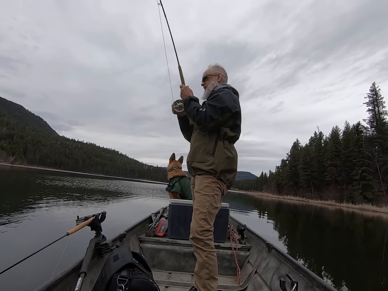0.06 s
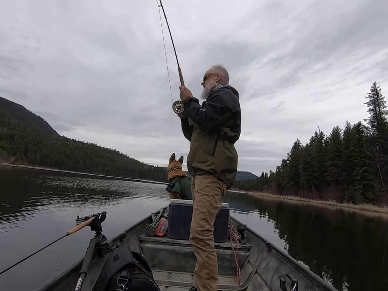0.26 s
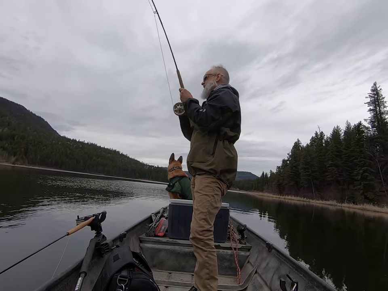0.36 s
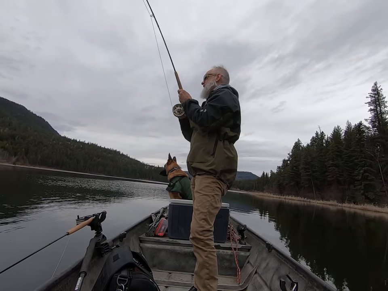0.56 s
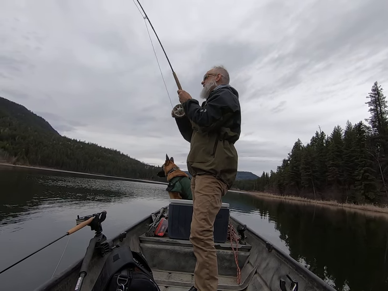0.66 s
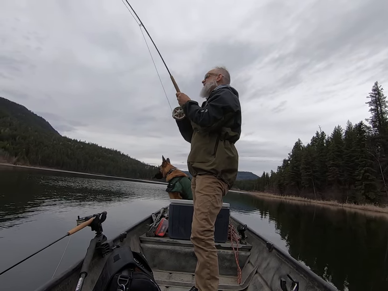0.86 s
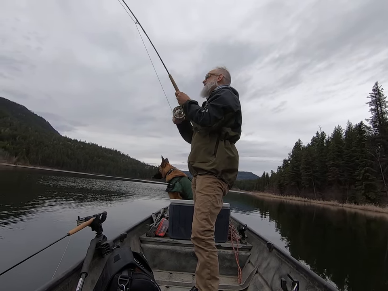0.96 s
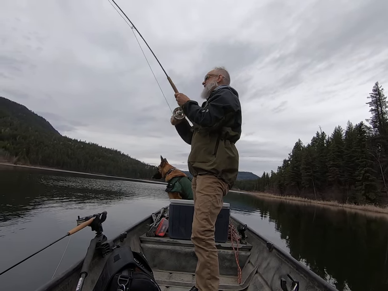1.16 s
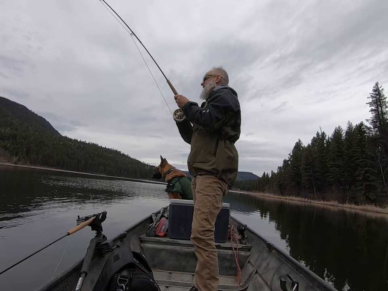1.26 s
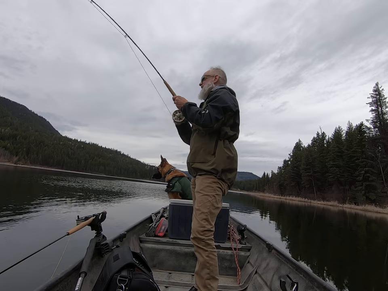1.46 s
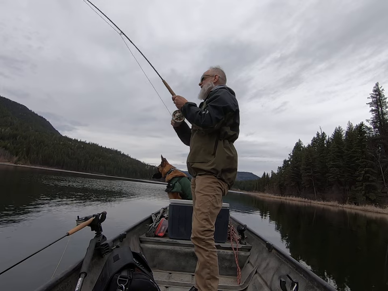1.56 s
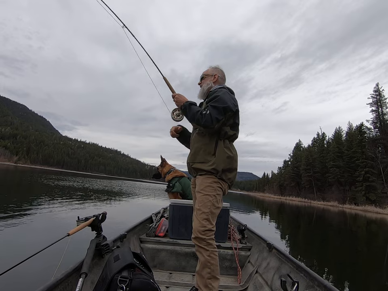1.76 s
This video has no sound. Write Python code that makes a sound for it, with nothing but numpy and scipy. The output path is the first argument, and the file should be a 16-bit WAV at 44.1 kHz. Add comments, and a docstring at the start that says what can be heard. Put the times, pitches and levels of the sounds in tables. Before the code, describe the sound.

A fly reel clicks rapidly as line is pulled off it in a small boat.

```python
"""A fly reel clicks quickly as line is pulled off it, in a small boat on a calm lake.
A small catch, the pawl, hits each tooth of the turning spool and makes a snap and a bright metal ring.
These swell and fade as the spool turns, while the line rasps and sings in the rod's guides.
Around them are a few dry ticks, soft knocks on the hull and a quiet wash of air and water."""
import sys
import numpy as np
from scipy import signal
from scipy.io import wavfile

SR = 44100
rng = np.random.default_rng(int(sys.argv[2]) if len(sys.argv) > 2 else 0)


def generate_wav(signal):
    """Clip the signal to [-1, 1] and save it as 16-bit WAV at the path in sys.argv[1]."""
    frames = np.transpose(np.atleast_2d(signal))
    scaled = np.clip(frames, -1, 1) * 32767
    pcm = np.round(scaled).astype(np.int16)
    wavfile.write(sys.argv[1], SR, pcm)


N = 79380
T = np.arange(N) / SR

# How fast the spool turns. Each row: time in seconds, teeth passing per second.
SPOOL_SPEED = [(0.2135, 87.1), (0.28, 166.5), (0.305, 151.3), (0.34, 110.6), (0.38, 94.7), (0.435, 144.3),
               (0.48, 105.9), (0.56, 178.1), (0.595, 125.4), (0.67, 147.8), (0.775, 142.5), (0.815, 192.8),
               (0.865, 153.9), (0.99, 167.1), (1.025, 195.0), (1.07, 135.8), (1.145, 193.2), (1.19, 127.6),
               (1.255, 180.2), (1.3, 150.8), (1.37, 184.0), (1.405, 136.1), (1.47, 177.2), (1.54, 49.0)]
# How hard the line is pulled. Each row: time in seconds, strength in dB.
LINE_PULL = [(.225, 1.5), (.29, -2.5), (.37, -2), (.48, -6), (.6, -1.5), (.73, -3), (.85, 0), (1.06, 1),
             (1.18, .5), (1.28, 2), (1.42, 1.5), (1.49, 4.5), (1.53, 6.5)]


def amp(db):
    """Turn decibels into a number to multiply a sound by."""
    return 10 ** (np.asarray(db) / 20)


def unit(x):
    """Scale a sound to an average power of one."""
    return x / np.sqrt(np.mean(x ** 2) + 1e-20)


def add(mix, start, sound):
    """Add a sound to the mix at a start time in seconds."""
    part = mix[:, max(round(start * SR), 0):][:, :sound.shape[1]]
    part += sound[:, :part.shape[1]]


def noise(size, width):
    """Stereo hiss: width 0 is the same in both ears, width 1 is unrelated."""
    mid, side = rng.standard_normal((2, size))
    return unit(np.array([mid + width * side, mid - width * side]))


def spread_noise(size, width=.55):
    """Hiss with its low notes in the middle and its treble spread wide."""
    mid, side = rng.standard_normal((2, size))
    side = width * (side - np.roll(side, 2))
    return np.array([mid + side, mid - side]) / np.sqrt(1 + width ** 2)


def colour(x, hz, db, size=2048):
    """Give a sound a tone colour; db only sets how strong the frequencies are against each other."""
    log_hz = np.log(abs(np.fft.fftfreq(size, 1 / SR)) + 1)
    log_gain = np.log(amp(np.interp(log_hz, np.log(hz), db)))
    taps = np.fft.ifft(np.exp(np.conj(signal.hilbert(log_gain)))).real[:size // 2]
    return signal.fftconvolve(x, taps / np.linalg.norm(taps))[:len(x)]


def band(hz, width_hz, size, width):
    """Noise gathered around one pitch, which may move."""
    smoothing = np.exp(-np.pi * abs(width_hz) / SR)
    flutter = noise(size + SR, width) + 1j * noise(size + SR, width)
    for _ in range(3):
        flutter = signal.lfilter([1 - smoothing], [1, -smoothing], flutter)
    tone = np.exp(2j * np.pi * np.cumsum(hz * np.ones(size)) / SR)
    return unit((flutter[:, SR:] * tone).real)


def air_and_water():
    """A quiet, slowly fading wash, with a hollow murmur of water under the hull."""
    # The wash's tone colour. Each row: frequency in Hz, relative level in dB.
    tone = [(20, -5), (40, -6.5), (70, -6), (110, -16.5), (150, 5), (185, 3.5), (250, -5), (480, -15),
            (700, -4.5), (1000, -12), (2000, -16), (4000, -16.5), (8000, -26.5), (15000, -41.5)]
    level_db, fall_db_per_s = -64.5, 2.5
    wash = np.array([colour(side, *np.transpose(tone), size=8192) for side in noise(N + 4096, width=1)])
    return wash[:, -N:] * amp(level_db - fall_db_per_s * T)


def boat_echo(x, size=9000):
    """Sound bounces off the deck and sides as a brief, soft echo."""
    level_db, fade_60_db_s = -12.5, .13
    t = np.arange(size) / SR
    tail = noise(size, width=0.31) * np.exp(-np.log(1000) * t / fade_60_db_s) * (t > .003)
    return amp(level_db) * signal.fftconvolve(x, tail / np.linalg.norm(tail[0]), axes=1)[:, :N]


def bursts(rows, width=0.56, rise_s=0.0077, size=12000):
    """Short, roughly pitched noises that rise quickly and die away."""
    out, t = np.zeros((2, N)), np.arange(size) / SR
    for start, db, hz, width_hz, decay in rows:
        rise = np.minimum(t / (rise_s + 1 / hz), 1)
        sound = band(hz, width_hz, size, width) * rise * np.exp(-t / decay)
        add(out, start, amp(db) * unit(sound) * np.sqrt(decay / 2 / t[-1]))
    return out


def hull_knocks():
    """Soft knocks and laps of water on the hull."""
    # Each row: start in seconds, level in dB, pitch in Hz, pitch spread in Hz, fade time in seconds.
    knocks = [(.032, -62, 707, 1210, 0.017), (.16, -53, 743, 254, 0.0029), (.175, -59, 33.7, 30, 0.015),
              (.243, -60.5, 498, 714, 0.033), (.27, -61.5, 1090, 1140, 0.031), (.78, -65, 704, 270, 0.0066),
              (1.107, -55.5, 621, 505, 0.014), (1.115, -59, 349, 680, 0.023),
              (1.743, -64, 687, 228, 0.0087)]
    return bursts(knocks)


def hand_ticks(size=4000):
    """A hand on the reel makes dry ticks, dull or bright, before and after the spool runs."""
    # Each row: start in seconds, level in dB, fade time in seconds, treble change in dB.
    ticks = [(.0085, -40.5, 0.0025, 11.5), (0.1245, -59, 0.0078, 0), (0.1446, -49, 0.0023, 9),
             (0.1596, -45, 0.0061, 1), (.1789, -46.5, 0.0054, -25), (0.196, -51, 0.051, -9),
             (1.661, -62, 0.0012, 14)]
    # The ticks' tone colour. Each row: frequency in Hz, relative level in dB.
    tone = [(500, -28), (2300, -16.5), (3200, 4), (3800, 5), (4600, -7), (6000, -5), (7500, -14.5),
            (9500, -21), (15000, -40)]
    out, t = np.zeros((2, N)), np.arange(size) / SR
    hz, tone_db = np.transpose(tone)
    for start, db, decay, treble_db in ticks:
        click = amp(db) * np.exp(-t / decay) * spread_noise(size)
        tick_db = tone_db + np.interp(hz, [4200, 6200], [0, treble_db])
        add(out, start, np.array([colour(side, hz, tick_db) for side in click]))
    return out


def guide_scrapes():
    """The line scrapes in a guide, one of the rings along the rod."""
    # Each row: start in seconds, level in dB, pitch in Hz, pitch spread in Hz, fade time in seconds.
    scrapes = [(.327, -50, 2520, 1140, 0.0066), (.413, -40.5, 2720, 1020, 0.0023),
               (1.04, -47.5, 2340, 455, 0.0063), (1.318, -55.5, 2212, 2220, 0.014),
               (1.386, -35, 2890, 1150, 0.0041), (1.405, -60, 1776, 620, 0.015),
               (1.475, -55.5, 2080, 1750, 0.021)]
    return bursts(scrapes)


def running_line():
    """The line sings in the guides in broken chirps, and rasps louder as the spool speeds up."""
    # The line's song. Each row: time in seconds, pitch in Hz, relative level in dB.
    song = [(.19, 3300, -60), (.225, 3300, -54), (.31, 2950, -53), (.39, 3200, -55), (.47, 3200, -62),
            (.515, 2450, -60), (.565, 3250, -49), (.585, 2750, -56), (.605, 2350, -55.5), (.68, 2850, -59),
            (.785, 2950, -59), (.814, 3380, -44), (.835, 3150, -52), (.86, 2900, -51), (.96, 3350, -49),
            (1.08, 2750, -58), (1.15, 3350, -50), (1.22, 2650, -58), (1.26, 3350, -49), (1.325, 2950, -48),
            (1.42, 3150, -52), (1.5, 3200, -46), (1.55, 3250, -60)]
    # The rasp's tone colour. Each row: frequency in Hz, relative level in dB.
    rasp_tone = [(400, -47), (1500, -27), (2100, -19.5), (2700, -10), (3200, 1.5), (3550, 8.5), (4200, -8),
                 (7000, -10), (15000, -29.5)]
    song_db, flicker_db, flicker_s, jerk_db = -4, 3, .014, 3
    rasp_db, pull_share = -46.5, 0.085
    times, hz, db = np.transpose(song)
    flicker = np.interp(T / flicker_s, np.arange(400), rng.standard_normal(400))
    level_db = song_db + np.interp(T, times, db, left=-120, right=-120) + flicker_db * flicker
    singing = amp(level_db) * band(np.interp(T, times, hz), width_hz=190, size=N, width=0.17)
    speed = np.interp(T, *np.transpose(SPOOL_SPEED), left=0, right=0)
    jerk = .5 - (np.cumsum(speed) / SR) % 1  # each tooth jerks the line
    pull_db = np.interp(T, *np.transpose(LINE_PULL))
    rasp = np.array([colour(side, *np.transpose(rasp_tone)) for side in noise(N, width=0.14)])
    rasp *= speed / speed.max() * amp(rasp_db + pull_share * pull_db)
    return singing * amp(jerk_db * jerk) + rasp


def tooth_strikes():
    """The pawl hits once per tooth: list each hit's time in seconds and its ring and snap changes in dB."""
    # How hard the pawl hits around one turn. Each row: share of the turn, ring in dB, snap in dB.
    turn = [(.02, 0, .5), (.13, -3, -.5), (.225, -14, -4), (.33, -1, -3), (.46, 2, -1.5), (.62, -2.5, -5.5),
            (.735, -16, -7.5), (.85, -5, -1)]
    teeth_per_turn, jitter_s, scatter_db = 35.4, .00003, 1.07
    pull_share, db_per_doubling, usual_speed = 0.028, 1.5, 150
    times, speed = np.transpose(SPOOL_SPEED)
    t = np.arange(times[0], times[-1] + .004, 1 / SR)
    passed = np.cumsum(np.interp(t, times, speed)) / SR
    tooth = np.arange(int(passed[-1]) + 1)
    starts = np.interp(tooth, passed, t) + jitter_s * rng.standard_normal(400)[tooth]
    angle, ring, snap = np.transpose(turn)
    turns = tooth / teeth_per_turn
    pull_db = np.interp(starts, *np.transpose(LINE_PULL))
    chance_db = scatter_db * rng.standard_normal((400, 2))[tooth]
    ring_db = np.interp(turns, angle, ring, period=1) + pull_db + chance_db[:, 0]
    snap_db = np.interp(turns, angle, snap, period=1) + pull_share * pull_db + chance_db[:, 1]
    snap_db += db_per_doubling * np.log2(np.interp(starts, times, speed) / usual_speed)
    return list(zip(starts, ring_db, snap_db))


def pawl_chatter(size, jitter_s=.000015):
    """The pawl lands on a tooth and bounces: sharp clicks, never timed quite alike."""
    # Each row: time after landing in seconds, relative level in dB.
    bounces = [(0, 0), (.00026, 0), (.0008, -2)]
    delay, db = np.transpose(bounces)
    chance = rng.standard_normal(len(db)) + .5 * rng.standard_normal((2, len(db)))
    starts = abs(delay + jitter_s * chance)
    clicks = amp(db)[:, None] * np.sinc(np.arange(size) - SR * starts[:, :, None])
    return unit(clicks.sum(1))


def reel_ratchet(size=2200):
    """Each hit of the pawl rings the metal reel and makes a snap of sharp clicks and a short buzz."""
    # The reel's ringing notes. Each row: pitch in Hz, relative level in dB, seconds to fade by 60 dB.
    notes = [(3160, -29, .04), (3340, -21, .05), (3590, -14, .02), (3690, -3, .026), (3745, 0, .026),
             (4149, -29, .035), (5480, -21, .016), (6200, -22, .018), (7700, -23, .013)]
    # The snap's tone colour. Each row: frequency in Hz, relative left and right levels in dB.
    snap_tone = [(287, -55, -25.5), (1740, -19, -17.5), (2730, -6.5, -18), (3090, -1, -1), (3980, 2.5, 1.5),
                 (4970, -0.5, -0.5), (6460, 7, 3), (6940, -5.5, -3), (7200, 2, 6), (9850, -3, -3.5),
                 (10070, -5.5, -5.5), (11350, -21.5, -22.5), (12300, -11, -15), (13800, -13, -12.5),
                 (15800, -23.5, -37)]
    ring_base_db, rise_cycles, detune = -34, 2.2, .0015
    snap_base_db, snap_s, tail_level, tail_s = -21, 0.0011, 0.3, 0.0083
    chatter_share, pawl_share, carry_over = .25, .3, .9
    pan_db = np.array([[-1], [1]])  # the ring sits a little to the right
    t = np.arange(size) / SR
    hz, db, ring_s = np.transpose(notes)[:, :, None]
    snap_shape = np.exp(-t / snap_s) + tail_level * np.exp(-t / tail_s)
    ring_shape = (1 - np.exp(-t * hz / rise_cycles)) ** 2 * np.exp(-np.log(1000) * t / ring_s)
    pawl, tooth = spread_noise(size), spread_noise(size)
    rings, snaps = np.zeros((2, 2, N))
    for start, ring_db, snap_db in tooth_strikes():
        # The pawl's part of the buzz stays the same; the rest drifts from tooth to tooth.
        tooth = carry_over * tooth + np.sqrt(1 - carry_over ** 2) * spread_noise(size)
        buzz = unit(snap_shape * (np.sqrt(pawl_share) * pawl + np.sqrt(1 - pawl_share) * tooth))
        snap = unit(np.sqrt(chatter_share) * pawl_chatter(size) + np.sqrt(1 - chatter_share) * buzz)
        add(snaps, start, amp(snap_base_db + snap_db) * snap / np.sqrt(size))
        pitches = hz * (1 + detune * rng.standard_normal(hz.shape))
        ring = (amp(db) * ring_shape * np.sin(2 * np.pi * pitches * t)).sum(0)
        add(rings, start, amp(ring_base_db + ring_db + pan_db) * ring)
    tone_hz, left_db, right_db = np.transpose(snap_tone)
    return rings + np.array([colour(snaps[0], tone_hz, left_db), colour(snaps[1], tone_hz, right_db)])


def scene():
    """Line, hull, hand and reel echo in the open boat, over the wash of air and water."""
    near = running_line() + guide_scrapes() + hull_knocks() + hand_ticks() + reel_ratchet()
    return near + boat_echo(near) + air_and_water()


def record(dry):
    """Cut away the very highest treble."""
    taps = signal.firwin(511, cutoff=15850, window=("kaiser", 9), fs=SR)
    return signal.oaconvolve(dry, taps[None], "same")


dry = scene()
out = record(dry)
generate_wav(out)
```